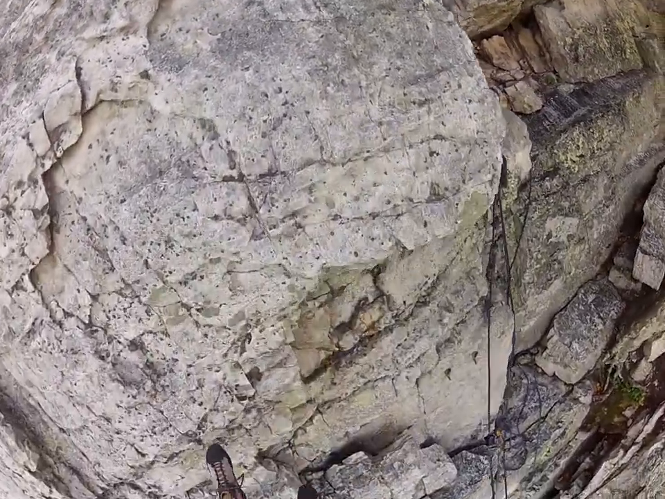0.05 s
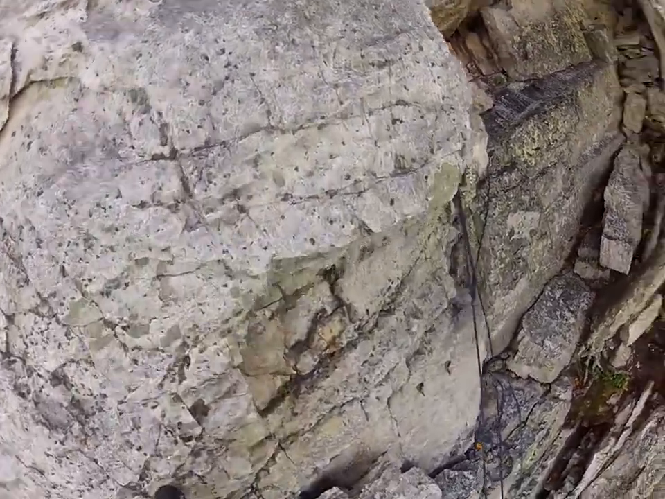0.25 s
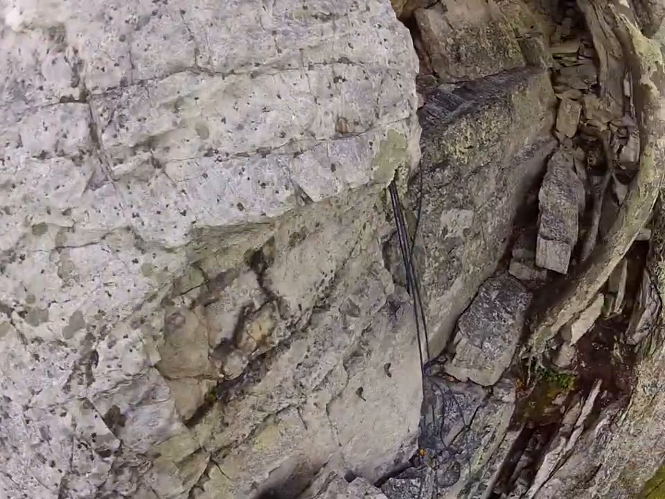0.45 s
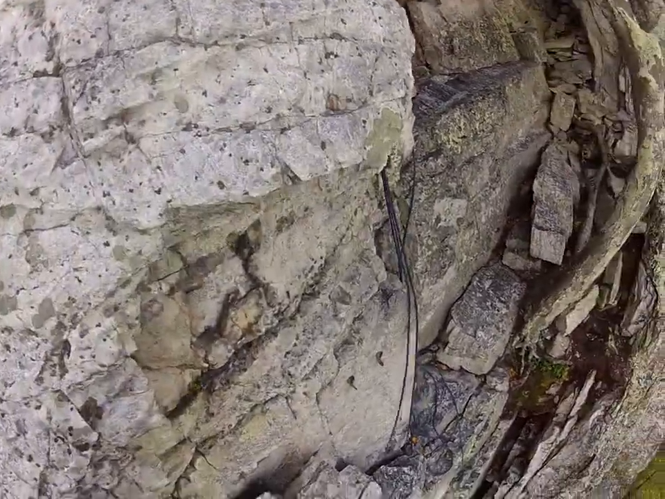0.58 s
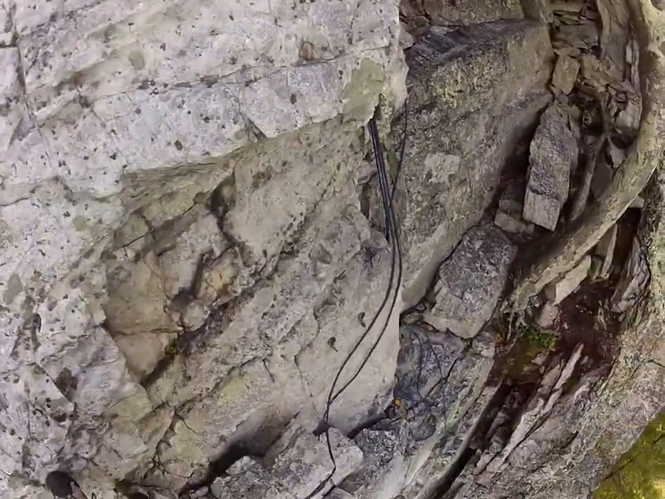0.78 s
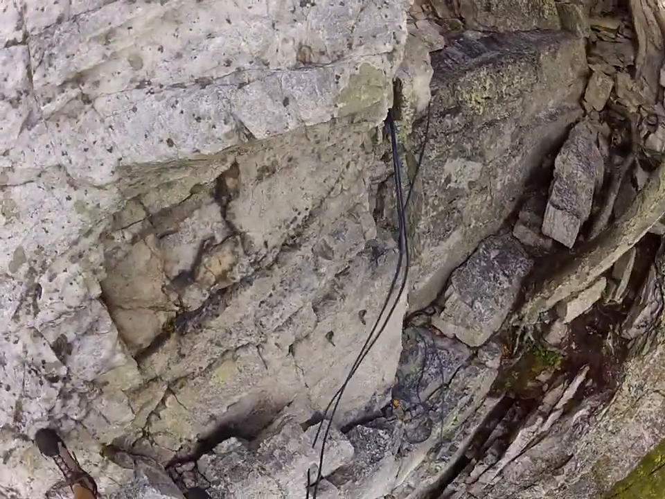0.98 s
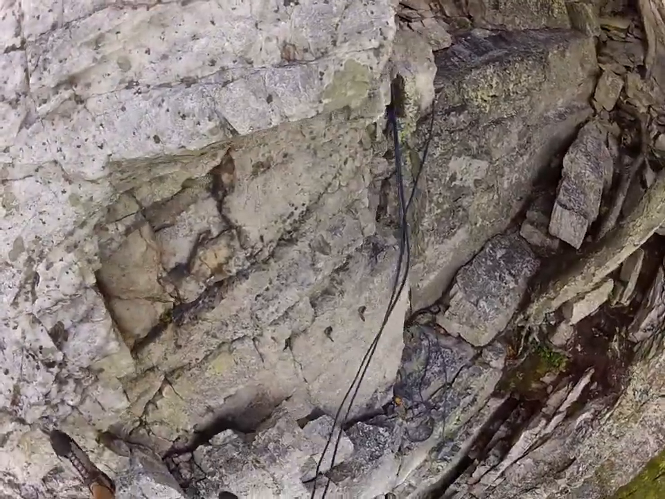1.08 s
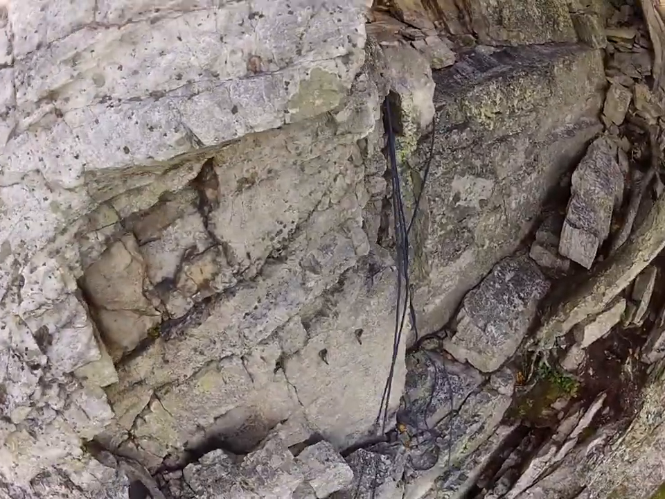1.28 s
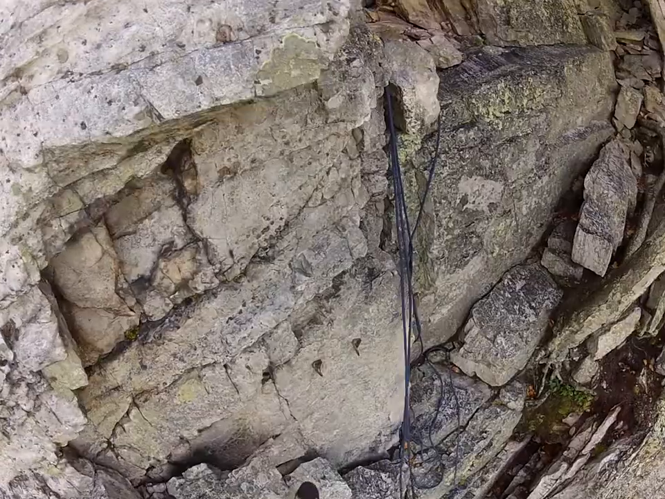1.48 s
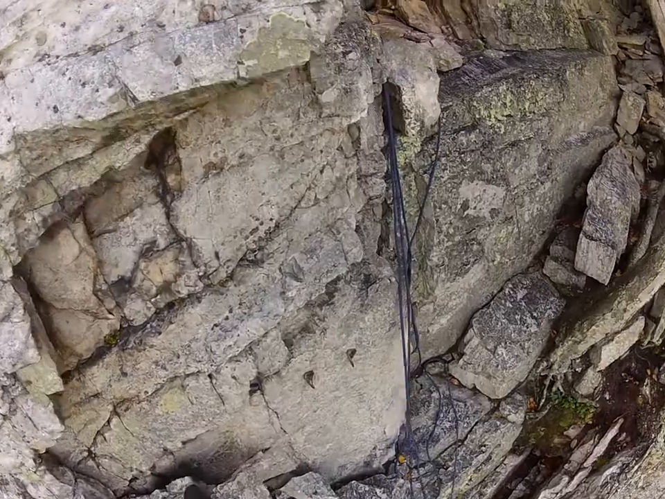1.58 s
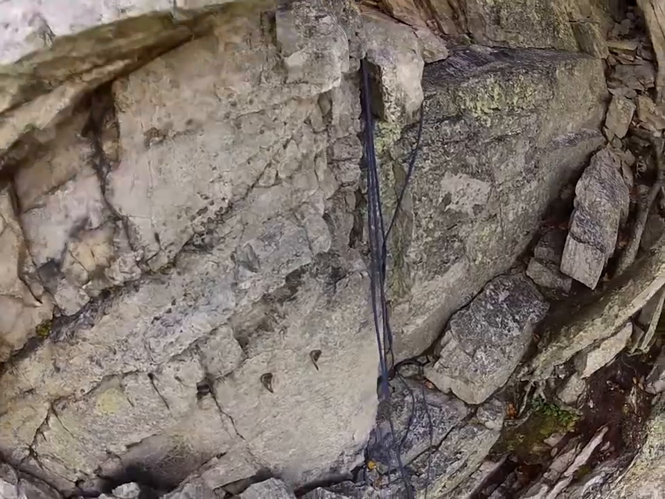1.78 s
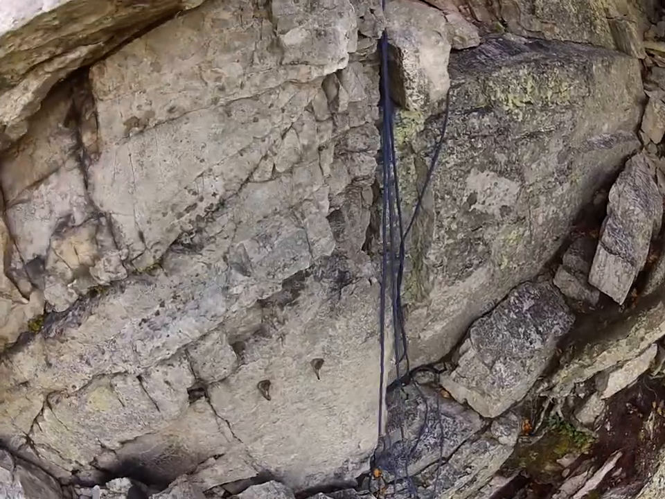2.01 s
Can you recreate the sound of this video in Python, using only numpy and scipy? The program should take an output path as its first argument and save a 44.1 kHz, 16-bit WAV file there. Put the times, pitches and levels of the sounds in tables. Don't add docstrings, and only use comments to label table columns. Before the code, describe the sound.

Low lumpy rumble of wind and movement on a small housed camera worn by a climber outdoors, with one strong dull thump early, faint rope scuffs, a small metal clink mid-way and more bumps near the end.

```python
import sys
import numpy as np
from scipy import signal
from scipy.fft import rfft, irfft, next_fast_len
from scipy.io import wavfile
from scipy.ndimage import uniform_filter1d, map_coordinates

SR = 44100
rng = np.random.default_rng(int(sys.argv[2]) if len(sys.argv) > 2 else 0)


def transcribe(u):
    v = np.clip(np.atleast_2d(u).T, -1, 1)
    q = np.round(v * 32767).astype(np.int16)
    wavfile.write(sys.argv[1], SR, q)


def field_ratio(decibels):
    return 10 ** (np.asarray(decibels, dtype=float) / 20)


N = 90404
SAMPLE_HZ = 12000


def unit(x):
    return x / np.sqrt(np.mean(x ** 2) + 1e-20)


def along(points, hz):
    f, value = np.transpose(points)
    return np.interp(np.log(hz + 1), np.log(f + 1), value)


def curve(rows):
    return np.interp(np.arange(N) / SR, *np.transpose(rows))


def wobble(rate_hz):
    knots = rng.standard_normal(N // 20)
    return map_coordinates(knots, [np.arange(N) * rate_hz / SR])


def filtered(x, response):
    length = x.shape[-1]
    m = next_fast_len(length + 8192)
    hz = np.fft.rfftfreq(m, 1 / SR)
    return irfft(rfft(x, m) * response(hz), m)[..., :length]


# t/s, level/dB
SHAKE_LEVEL = [(0.0, -50.5), (0.28, -53.5), (0.43, -50.5), (0.71, -52), (1.09, -56.5), (1.4, -57),
               (1.57, -60), (1.7, -49.5), (2.05, -58)]
# f/Hz, density/dB
SHAKE_TONE = [(10, -15), (20, -5), (45, -1), (72, -4), (86, 1.5), (98, -17), (135, -19), (200, -49.5)]


def shake():
    lumps_db, lumps_hz, evenness = 2.5, 14.08, 0.7
    noise = filtered(rng.standard_normal(N), lambda hz: field_ratio(along(SHAKE_TONE, hz)))
    power = np.abs(uniform_filter1d(noise ** 2, size=2500))
    noise = unit(noise / power ** (evenness / 2))
    return field_ratio(curve(SHAKE_LEVEL) + lumps_db * wobble(lumps_hz)) * noise


# f/Hz, width/Hz, lift/dB
CAVITIES = [(246, 89, 1), (421, 116, 4), (857, 117, 10), (1220, 500, 7), (1751, 270, 7), (2133, 140, 7),
            (2605, 200, 6), (3270, 240, 3), (4900, 240, 5)]


def housing(hz):
    edge_hz, edge_width_hz, edge_db = 6175, 250, -12.5
    lift = sum(db / (1 + (2 * (hz - centre) / width) ** 2) for centre, width, db in CAVITIES)
    return field_ratio(lift + edge_db / (1 + ((hz - edge_hz) / edge_width_hz) ** 2))


# t/s, level/dB
AIR_LEVEL = [(0.0, -59), (0.21, -61.5), (0.59, -60.5), (0.82, -62), (2.05, -62.5)]
# f/Hz, density/dB
AIR_TONE = [(53, -35), (90, 7.5), (182, 1.5), (415, -7), (795, -16), (868, -16), (1020, -17.5),
            (2620, -15.5), (5990, -23.5), (7790, -62), (13200, -120)]


def air():
    over_db, patchy_db, flutter_db, flutter_hz = 3.5, 1, 0.41, 11.95
    z = signal.stft(rng.standard_normal(N + 512), nperseg=512)[2]
    field = uniform_filter1d(rng.standard_normal(z.shape), size=6, axis=0)
    field = uniform_filter1d(field, size=10, axis=1)
    noise = signal.istft(z * field_ratio(patchy_db * unit(field)), nperseg=512)[1][:N]
    noise = unit(filtered(noise, lambda hz: field_ratio(along(AIR_TONE, hz)) * housing(hz)))
    return field_ratio(curve(AIR_LEVEL) + over_db + flutter_db * wobble(flutter_hz)) * noise


# t/s of the crest, peak level/dB, f/Hz, length/s
JOLTS = [(.048, -49, 62, 0.011), (0.096, -45, 70.6, .010), (0.154, -48, 49.6, 0.011),
         (0.2252, -22, 57.4, 0.01), (.228, -37, 30.5, 0.019), (.250, -30.5, 45, .008),
         (0.33, -39, 56, 0.015), (.445, -43.5, 82, .03), (0.58, -45.5, 55, 0.013), (.648, -47, 65, 0.013),
         (.885, -50, 85, .03), (0.93, -46, 70, .010), (1.137, -38.5, 60.4, 0.0094),
         (1.234, -44.5, 62, 0.0085), (1.643, -32, 59.7, 0.011), (1.658, -42, 60, .008),
         (1.734, -30.5, 70, .013), (1.727, -42, 40, .008), (1.773, -36, 56, .014), (1.822, -48, 75, .02),
         (1.897, -48, 30.2, .03), (2.033, -46, 73, 0.007)]


def jolts():
    lead_s = .0022
    t = np.arange(N) / SR
    out = np.zeros(N)
    for crest_s, db, hz, length_s in JOLTS:
        swell = np.exp(-.5 * ((t - crest_s + lead_s) / length_s) ** 2)
        out += field_ratio(db) * swell * np.cos(2 * np.pi * hz * (t - crest_s))
    return out


# t/s, level/dB, length/s, centre f/Hz
SCUFFS = [(.060, -58.5, 0.017, 2800), (0.102, -64, .02, 1900), (0.125, -56, .024, 2700),
          (.17, -66, 0.012, 4830), (0.289, -67, .012, 4900), (0.317, -66.5, 0.043, 4900),
          (.440, -60, 0.044, 1770), (0.522, -60.5, 0.025, 2500), (.555, -55.5, 0.03, 2840),
          (.588, -56, 0.0075, 4800), (.608, -63, 0.014, 4800), (.44, -69, 0.031, 5000),
          (0.714, -55, 0.0077, 3500), (0.737, -62, 0.012, 5000), (.857, -64.5, 0.048, 3180),
          (0.989, -65.5, .01, 4000), (1.079, -67, 0.043, 1900), (1.115, -64, 0.046, 3180),
          (1.145, -66.5, .05, 2980), (1.205, -64.5, 0.03, 3500), (1.617, -63.5, 0.015, 3000),
          (1.7065, -54, .006, 1700), (1.720, -60, .03, 1500), (1.762, -66, 0.042, 1900),
          (1.886, -65, .014, 4000), (1.913, -59, 0.021, 4000)]


def scuffs():
    rise_s, octaves, grain_db, grain_hz = .001, 1.05, 2.2, 900
    out, t = np.zeros(N + SR), np.arange(SR // 8) / SR
    noise = rng.standard_normal((len(SCUFFS), len(t)))
    grain = field_ratio(grain_db * wobble(grain_hz))
    for (s, db, length_s, centre_hz), row in zip(SCUFFS, noise):
        def band(hz):
            bell = np.exp(-.5 * (np.log2((hz + 1) / centre_hz) / octaves) ** 2)
            return bell * housing(hz) * (hz < SAMPLE_HZ / 2)

        at = round(s * SR)
        shape = (1 - np.exp(-t / rise_s)) * np.exp(-(t / length_s) ** 2)
        burst = shape * filtered(row, band) * grain[at:at + len(t)]
        out[at:at + len(t)] += field_ratio(db) * unit(burst) * np.sqrt(np.mean(shape ** 2))
    return out[:N]


# t/s, peak level/dB, f/Hz, decay time T60/s
CLINKS = [(.061, -58, 2140, .06), (.128, -62, 4200, .06), (.531, -61, 5000, .04), (.558, -54, 3440, .07),
          (.562, -57, 5706, .08), (.563, -57, 2500, .08), (.5725, -45, 5706, .085), (.5725, -51, 3440, .04),
          (.589, -56, 5050, .02), (.589, -57, 2150, .06), (.611, -60, 5706, .04), (1.010, -65, 4830, .12),
          (1.080, -63, 1760, .15), (1.110, -65, 3250, .2), (1.151, -61, 4980, .06), (1.160, -68, 4900, .25),
          (1.196, -61, 3250, .16), (1.617, -61, 3070, .05), (1.765, -60, 2600, .12),
          (1.914, -58, 2530, .07), (1.916, -63, 5700, .05)]


def clinks():
    rise_s, waver_rad, waver_hz, rattle_db, rattle_hz = .0005, .5, 150, 1.2, 160
    out, t = np.zeros(N + SR), np.arange(SR // 5) / SR
    waver = waver_rad * wobble(waver_hz)
    for s, db, hz, t60 in CLINKS:
        at = round(s * SR)
        phase = 2 * np.pi * hz * t + np.resize(waver[at:], len(t))
        envelope = field_ratio(db - 60 * t / t60) * (1 - np.exp(-t / rise_s))
        out[at:at + len(t)] += envelope * np.sin(phase)
    return out[:N] * field_ratio(rattle_db * wobble(rattle_hz))


# t/s, level/dB
HOWL_LEVEL = [
    (.55, -88),
    (.68, -69.5),
    (.85, -70.5),
    (1.0, -82),
]


def howl():
    centre_hz, width_hz = 875, 110
    noise = rng.standard_normal(N)
    tone = filtered(noise, lambda hz: 1 / (1 + (2 * (hz - centre_hz) / width_hz) ** 2))
    return field_ratio(curve(HOWL_LEVEL)) * unit(tone)


def scene():
    return np.tile(shake() + air() + jolts() + scuffs() + clinks() + howl(), (2, 1))


def held(x):
    stored_hz = 48000
    m = 147 * (N // 147 + 8)
    period = m * SAMPLE_HZ // SR
    slow = irfft(rfft(x, m)[:, :period // 2 + 1], period)
    spectrum = np.fft.fft(slow, axis=1)
    k = np.arange(m // 2 + 1)
    hold = np.sinc(k / period) / np.sinc(k / period * SAMPLE_HZ / stored_hz)
    return irfft(spectrum[:, k % period] * hold, m)[:, :N]


def band_limit(x):
    return signal.sosfilt(signal.butter(12, 15460, fs=SR, output="sos"), x)


# f/Hz, density/dB
HISS_TONE = [(20, 2), (300, 12.5), (1000, -1), (2000, 2), (4000, 2.5), (5300, 4), (6000, -42)]


def record(dry):
    hiss_db, top_hz = -76.5, 15330
    hiss = unit(filtered(rng.standard_normal((2, N)), lambda hz: field_ratio(along(HISS_TONE, hz))))
    stored = filtered(held(dry + field_ratio(hiss_db) * hiss), lambda hz: hz < top_hz)
    return band_limit(stored)


dry = scene()
out = record(dry)
transcribe(out)
```